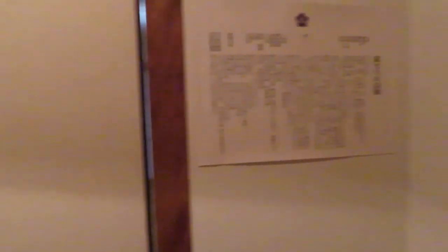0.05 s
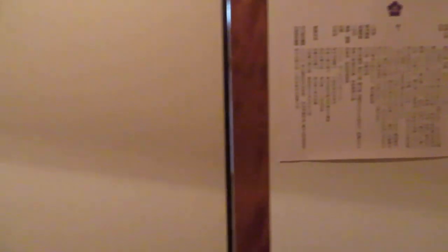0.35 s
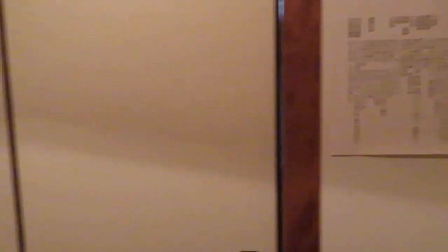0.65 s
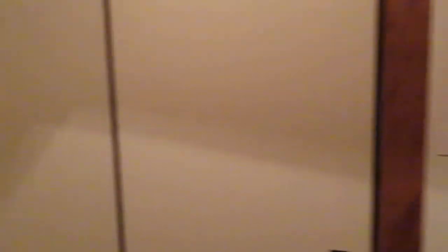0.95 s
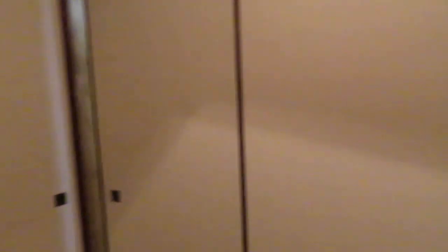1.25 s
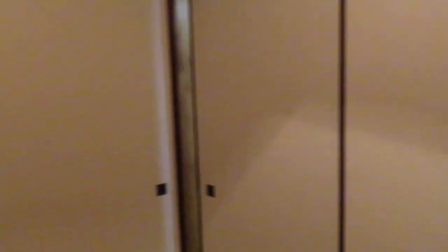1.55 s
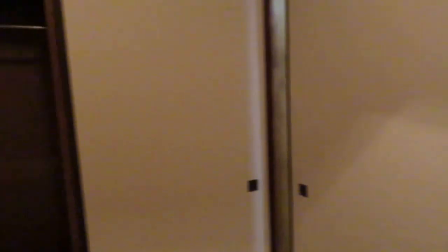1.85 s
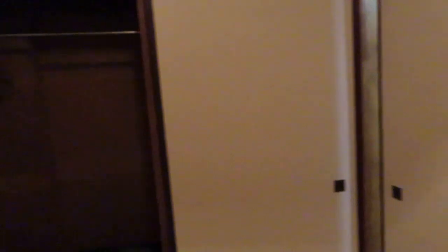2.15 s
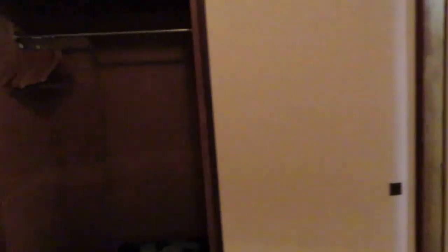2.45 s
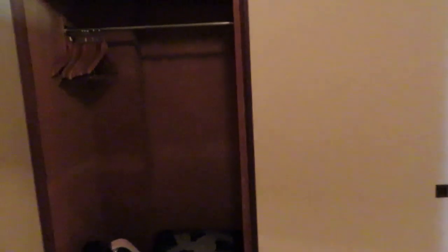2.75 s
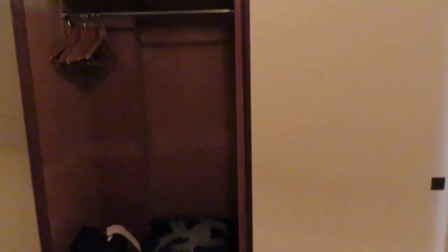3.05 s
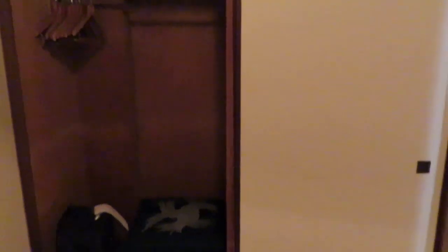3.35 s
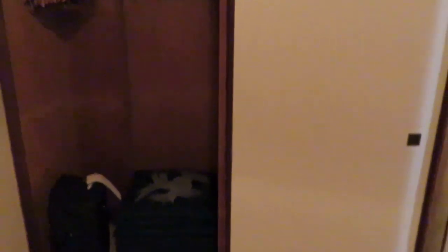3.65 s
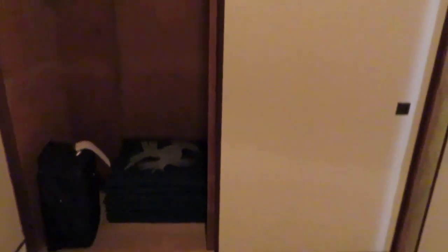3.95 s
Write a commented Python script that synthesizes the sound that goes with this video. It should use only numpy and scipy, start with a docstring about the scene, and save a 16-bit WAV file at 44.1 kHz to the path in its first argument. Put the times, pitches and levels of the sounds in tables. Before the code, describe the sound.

In a small quiet room with microphone hiss and low hum, someone shuffles softly. Then a light sliding door knocks and rattles, bangs on its wooden frame and begins to slide with a scraping, juddering drone.

```python
"""A wide microphone hiss and a mains hum lie over a small quiet room. For two seconds someone shuffles
about: cloth rustles faintly and a foot steps softly on a mat. At 2.4 s a light sliding cupboard door
is knocked and rattles in its track. Near 3.5 s it bangs against its wooden frame and starts
to slide, wood scraping on wood. From 3.8 s it judders along the groove with a low drone."""
import sys
import numpy as np
from scipy import signal
from scipy.fft import rfft, irfft
from scipy.io import wavfile

SR = 44100
rng = np.random.default_rng(int(sys.argv[2]) if len(sys.argv) > 2 else 0)


def generate_wav(sig):
    """Save sig (samples, or channels by samples) to the path in sys.argv[1] as 16-bit PCM at SR."""
    pcm = np.round(np.clip(np.atleast_2d(sig).T, -1, 1) * 32767).astype(np.int16)
    wavfile.write(sys.argv[1], SR, pcm)


N = 176400
T = np.arange(N) / SR
FREQS = np.maximum(np.fft.rfftfreq(2 * N, 1 / SR), 1)
# tone of wood hitting wood: f/Hz, level/dB
WOOD_TONE = [(40, -23), (80, -12.5), (160, -5), (250, 2), (400, .5), (600, -3.5), (900, -4), (1500, -5),
             (2200, -7.5), (3200, -14.5), (4300, -18.5), (6000, -25), (9000, -35), (15000, -58)]


def knocks():
    """Each blow cracks into the room and sets panel and frame ringing; edges and fittings tick."""
    # blows on the door: t/s, crack level/dB, treble tilt/(dB per octave), panel level/dB, frame level/dB
    blows = [(2.366, -31.5, -0.6, -54, -58), (2.377, -30, 0.1, -26, -48), (2.402, -34, -1.2, -30, -62),
             (2.546, -42, -7, -52, -47), (2.578, -37, -1.3, -46, -47), (2.628, -38.5, 0.4, -36, -50),
             (2.984, -52.5, -0.5, -50.5, -62), (3.365, -44, -4, -46, -44), (3.416, -27.5, -0.9, -36, -32),
             (3.430, -24, -0.35, -41, -34), (3.462, -21, 2.5, -45, -49), (3.469, -16, 0.7, -27.5, -20),
             (3.477, -17.5, 1.03, -32.5, -26.5), (3.524, -28, -1, -33, -26), (3.655, -46, -16, -53, -34),
             (3.724, -41.5, -4.5, -58, -36), (3.765, -42, -6, -55, -36)]
    # notes of the broad, light panel: f/Hz, level/dB, time to fade by 60 dB/s
    panel_notes = [(51.35, 2.5, 0.88), (80.5, -23, 0.61), (187.7, -0.5, 0.59), (230, -9, 1)]
    # notes of the wooden frame: f/Hz, level/dB, time to fade by 60 dB/s
    frame_notes = [(260.4, -2.5, 0.45), (315.4, 0.5, 0.32), (360.7, -0.5, 0.42), (498.3, -2.5, 0.15),
                   (497, -5, 0.16), (682, -14.5, 0.3), (904, -5, 0.2), (1020, -19, 0.2),
                   (1326, -11.5, 0.29), (1513, -11, 0.33), (1870, -17, 0.17), (3240, -15, 0.24)]
    # light ticks: t/s, level/dB, f/Hz, width/Hz
    ticks = [(2.367, -42, 2450, 600), (2.378, -36, 1340, 450), (2.374, -49, 7000, 1800),
             (2.579, -51, 2670, 1200), (2.632, -49, 5600, 790), (2.982, -54, 2670, 1300),
             (3.462, -47, 13500, 3500), (3.463, -39, 7830, 2500)]
    out = 0
    for start, db, tilt_db, panel_db, frame_db in blows:
        panel = undb(panel_db) * ring(panel_notes, rise_s=0.017, detune=.002)
        frame = undb(frame_db) * ring(frame_notes, rise_s=0.0062, detune=.011)
        crack = undb(db) * colour(at(room(), start), WOOD_TONE, tilt_db)
        out = out + crack + at(panel + frame, start)
    return out + sum(undb(db) * resonance(at(room(), start), hz, width) for start, db, hz, width in ticks)


def ring(notes, rise_s, detune, size=65536):
    """Struck wood rings with fading notes, tuned a little differently on each blow."""
    t, out = T[:size], 0
    for (hz, db, fade_s), (offset, side) in zip(notes, rng.standard_normal((len(notes), 2))):
        note = undb(db) * np.sin(2 * np.pi * hz * (1 + detune * offset) * t)
        out = out + note * fade(t, fade_s) * np.array([[1], [side]])
    return out * (1 - np.exp(-t / rise_s))


def slide():
    """Wood catches on wood in tiny slips, brighter under more force; the groove rings."""
    # force of the door on its groove: t/s, level/dB
    push = [(3.52, -19), (3.56, -4), (3.64, -10), (3.67, -12), (3.705, -22.5), (3.728, -5), (3.75, -11),
            (3.785, -12.5), (3.81, -2.5), (3.86, -1), (3.92, 1.5), (3.97, 1.8), (4.0, -6)]
    # tone of the scraping: f/Hz, level/dB
    scrape_tone = [(150, -9), (300, -0.5), (480, 0), (600, -11.5), (1050, -4), (1800, -12), (3100, -10.5),
                   (4000, -19), (5000, -26.5), (7200, -26), (9000, -41.5), (11000, -36), (14000, -60.5)]
    # notes of the groove: f/Hz, width/Hz, level/dB
    groove_notes = [(220.4, 19, -31.5), (267, 19, -40.5), (343, 20, -41), (383, 22, -33), (467, 53, -37),
                    (834, 18, -41.5), (1606, 36, -42), (3050, 490, -50.5)]
    dull_above_hz, groove_follow = 4070, 0.57
    force_db = np.interp(T, *np.array(push).T, left=-200)
    force = undb(force_db)
    grains = slips(per_s=2400)
    dull = shape(grains, 1 / (1 + (FREQS / dull_above_hz) ** 8))
    rubbing = force * (dull + force / force.max() * (grains - dull))
    scrape = undb(-30.5) * colour(in_room(rubbing), scrape_tone)
    shaking = in_room(grains * undb(groove_follow * force_db) * (T > push[0][0]))
    return scrape + sum(undb(db) * resonance(shaking, hz, width) for hz, width, db in groove_notes)


def judder():
    """As the door gathers speed it sticks and slips almost regularly and drones."""
    # tones of the drone: multiple of the slip rate, level/dB
    harmonics = [(1, -34.5), (2, -30.5), (3, -42.5), (4, -42)]
    start_s, rise_s, slip_hz, jitter = 3.785, 0.12, 109.1, 0.0073
    waver = unit(shape(noise()[0], 1 / (1 + (FREQS / 30) ** 2)))
    phase = 2 * np.pi * np.cumsum(slip_hz * (1 + jitter * waver)) / SR
    drone = sum(undb(db) * np.sin(round(k) * phase) for k, db in harmonics)
    return np.sqrt(2) * drone * np.clip((T - start_s) / rise_s, 0, 1)


def chatter():
    """The loose panel goes on rattling faintly in its track after the knock."""
    # strength of the rattle: t/s, level/dB
    levels = [(2.39, -67), (2.44, -40), (2.55, -41.5), (2.64, -42), (2.75, -54.5), (2.93, -47), (3.1, -62),
              (3.3, -69)]
    strength = undb(np.interp(T, *np.array(levels).T, left=-200, right=-200))
    return colour(in_room(slips(per_s=300) * strength), WOOD_TONE, tilt_db=-4)


def rustles():
    """Cloth brushes softly, in swells of noise."""
    # rustles: peak t/s, rise/s, fall/s, level/dB, treble tilt/(dB per octave)
    brushes = [(.03, 0.1, 0.17, -53, -0.5), (.518, 0.05, 0.05, -47.5, 2), (.82, 0.17, 0.076, -55.5, -1),
               (1.2, 0.058, 0.17, -52.5, -1), (1.81, .08, 0.18, -48.5, 1.2)]
    # tone of the cloth: f/Hz, level/dB
    cloth_tone = [(240, -27), (400, 3.5), (611, -4), (791, 0), (993, -6.5), (1540, -7), (3490, -12.5),
                  (3830, -13.5), (15000, -37)]
    fibres = noise()
    return sum(undb(db) * swell(peak, rise, fall) * colour(fibres, cloth_tone, tilt_db)
               for peak, rise, fall, db, tilt_db in brushes)


def steps():
    """Feet step and scuff on the mat, in dull puffs of noise."""
    # steps and scuffs: peak t/s, rise/s, fall/s, level/dB
    scuffs = [(1.566, 0.01, 0.027, -43), (1.635, 0.013, .03, -50.5), (1.935, .045, 0.064, -43.5),
              (2.06, 0.015, 0.078, -57.5)]
    # tone of the mat: f/Hz, level/dB
    mat_tone = [(100, -15), (250, -6.5), (420, 7), (650, -3), (1100, -7.5), (2500, -19.5), (6000, -43),
                (15000, -54)]
    strength = sum(undb(db) * swell(peak, rise, fall) for peak, rise, fall, db in scuffs)
    return strength * colour(noise(), mat_tone)


def hum():
    """The mains hums on one low note that slowly swells and sinks."""
    # strength of the hum: t/s, level/dB
    levels = [(0, -57), (.6, -57), (1.2, -51), (2.2, -51), (3.2, -47.5), (4, -51.5)]
    hum_hz = 119.4
    return np.sqrt(2) * undb(np.interp(T, *np.array(levels).T)) * np.sin(2 * np.pi * hum_hz * T)


def hiss():
    """A wide, even microphone hiss lies over faint, low background noise."""
    # tone of the hiss and low noise: f/Hz, level/dB
    hiss_tone = [(20, -2.5), (50, -9), (92, -9), (150, -10), (200, -9), (300, -9.5), (450, -16.5),
                 (600, -20.5), (1250, -24), (2400, -29), (4000, -32), (8000, -39.5), (12000, -44.5),
                 (15000, -50)]
    # their stereo width: f/Hz, side minus mid level/dB
    width = [(30, -17), (60, -27), (120, -6.5), (200, -8.5), (400, -0.5), (1200, -0.5), (4000, -3.5),
             (14000, -3)]
    return stereo(undb(-48) * colour(noise(), hiss_tone), width)


def room(size=32768):
    """A click in the room, as mid and side: direct sound, dense early echoes, a tail that dulls."""
    # how long the room rings: f/Hz, time to fade by 60 dB/s
    fade_times = [(100, 0.94), (400, 0.48), (1500, 0.38), (4000, 0.52), (8000, 0.32), (15000, 0.29)]
    early_s, late_db, build_s, direct_db = 0.019, -6.5, 0.0022, -14
    t, f = T[:size], np.maximum(np.fft.rfftfreq(size, 1 / SR), 1)
    spectrum = rfft(rng.standard_normal((2, size)))
    centres, tail = [hz for hz, _ in fade_times], 0
    for share, (_, fade_s) in zip(np.eye(len(centres)), fade_times):
        band = irfft(spectrum * over_hz(list(zip(centres, share)), f))
        tail = tail + band * fade(t, fade_s)
    out = tail * (np.exp(-t / early_s) + undb(late_db)) * (1 - np.exp(-t / build_s))
    out[0, 0] += undb(direct_db) * np.sqrt(np.sum(out[0] ** 2))
    return out


def in_room(x):
    """Pass a lasting sound through the room at equal power."""
    echo = room()
    return signal.fftconvolve(x[None], echo / np.sqrt(np.sum(echo[0] ** 2)), axes=1)[:, :N]


def slips(per_s):
    """Tiny contacts at random moments, of uneven size."""
    happens = rng.random(N) < per_s / SR
    return unit(happens * np.sign(noise()[0]) * undb(3 * noise()[0]))


def swell(peak, rise, fall):
    """A rounded rise and a fading fall."""
    return np.exp(-np.where(T < peak, ((T - peak) / rise) ** 2, (np.abs(T - peak) / fall) ** 1.93) / 2)


def fade(t, fade_s):
    """Die away by 60 dB every fade_s seconds."""
    return np.exp(-np.log(1000) * t / fade_s)


def undb(db):
    """Turn decibels into a gain."""
    return 10 ** (np.asarray(db) / 20)


def unit(x):
    """Scale to an average power of 1."""
    return x / np.sqrt(np.mean(np.abs(x) ** 2))


def over_hz(points, hz=FREQS):
    """Join (Hz, value) points into a curve, with octaves evenly spaced."""
    f, v = np.array(points).T
    return np.interp(np.log(hz), np.log(f), v)


def shape(x, gain):
    """Give each frequency its own gain."""
    return irfft(rfft(x, 2 * N) * gain)[..., :N]


def colour(x, tone, tilt_db=0):
    """Give a sound a tone, made brighter by tilt_db per octave."""
    octaves = np.log2(np.maximum(FREQS, 200) / 1000)
    gain = unit(undb(over_hz(tone) + tilt_db * octaves))
    # fold the filter in time so that it never rings before the sound arrives
    folded = irfft(np.log(gain))
    folded[1:N] *= 2
    folded[N + 1:] = 0
    return shape(x, np.exp(rfft(folded)))


def resonance(x, hz, width_hz):
    """Let a sound ring around one pitch, with little left an octave away."""
    away = (FREQS ** 2 - hz ** 2) / FREQS
    return shape(x, unit(1 / (1 + 1j * away / width_hz) / (1 + 1j * away / hz) ** 2))


def noise():
    """Separate noise for mid and side."""
    return rng.standard_normal((2, N))


def at(x, start):
    """Place a sound on the time line."""
    return np.pad(x, ((0, 0), (int(start * SR), N)))[:, :N]


def stereo(x, width):
    """Turn mid (what both ears share) and side (how they differ) into left and right."""
    return x[0] + shape(x[1], undb(over_hz(width))) * np.array([[1], [-1]])


def scene():
    """Door and person, with bass in the middle and treble wide, over hum and hiss."""
    # stereo width: f/Hz, side minus mid level/dB
    width = [(30, -41), (200, -44), (400, -36), (700, -25.5), (1300, -19.5), (2400, -13), (4300, -8),
             (8000, -3), (14000, 8.5)]
    door_and_person = knocks() + chatter() + slide() + rustles() + steps()
    return stereo(door_and_person, width) + judder() + hum() + hiss()


def record(dry):
    """Cut off the very highest treble."""
    top_hz = 15400
    return signal.sosfilt(signal.ellip(10, .2, 80, top_hz, fs=SR, output="sos"), dry)


dry = scene()
out = record(dry)
generate_wav(out)
```